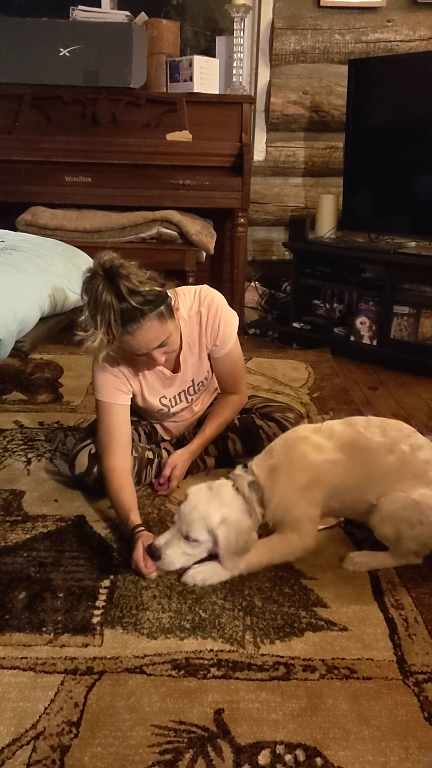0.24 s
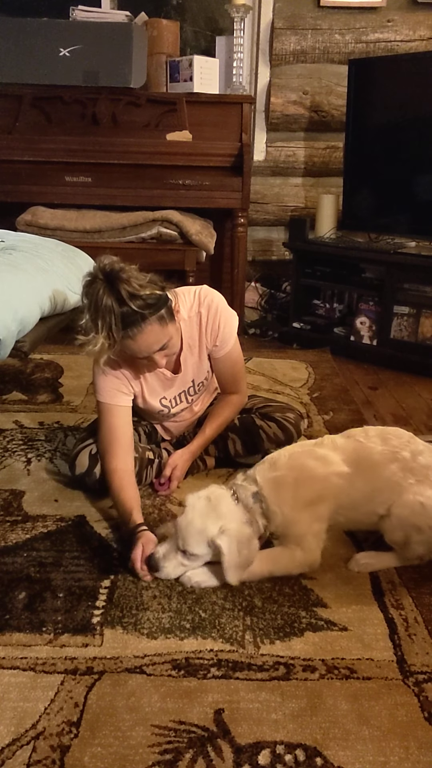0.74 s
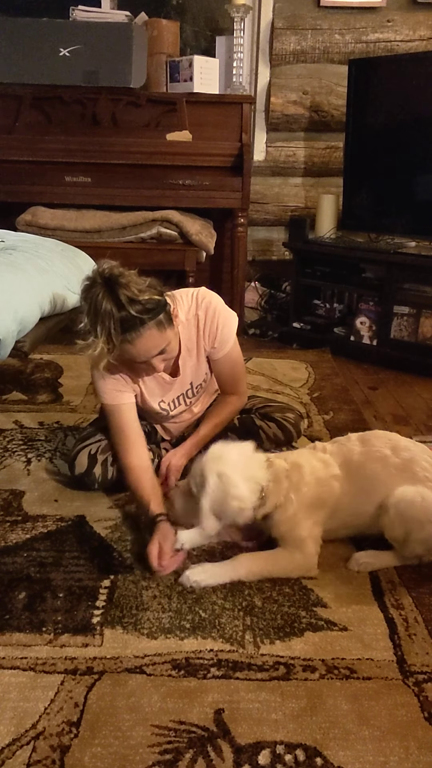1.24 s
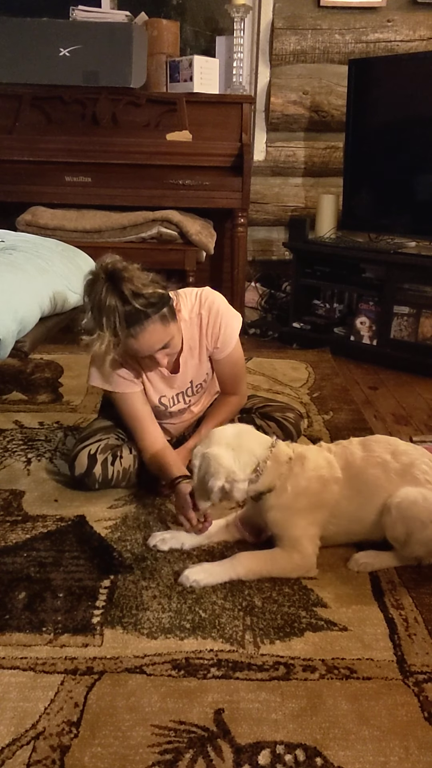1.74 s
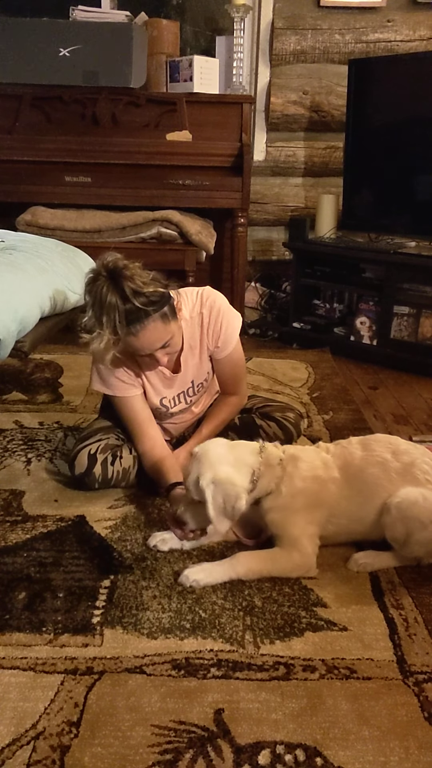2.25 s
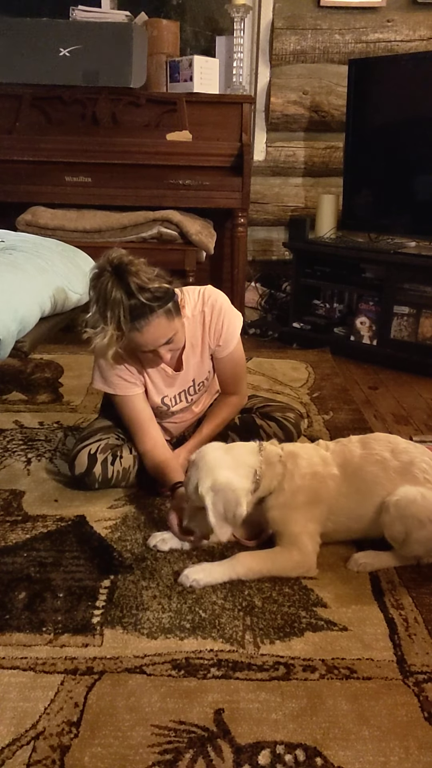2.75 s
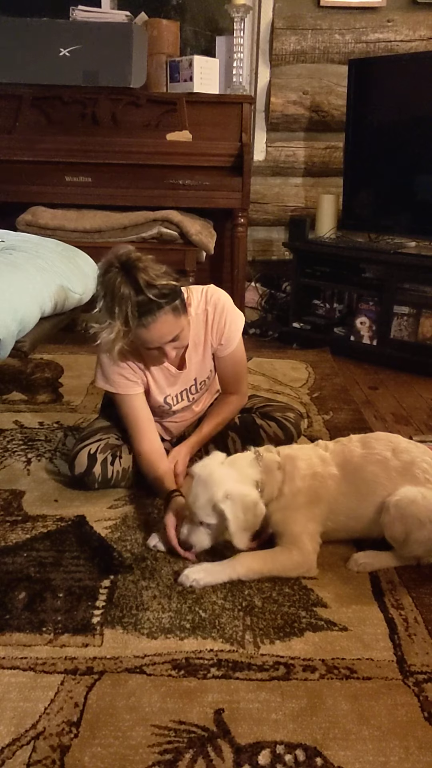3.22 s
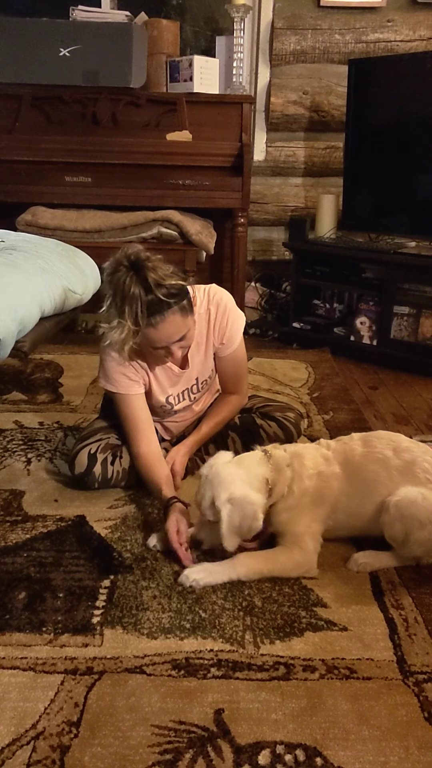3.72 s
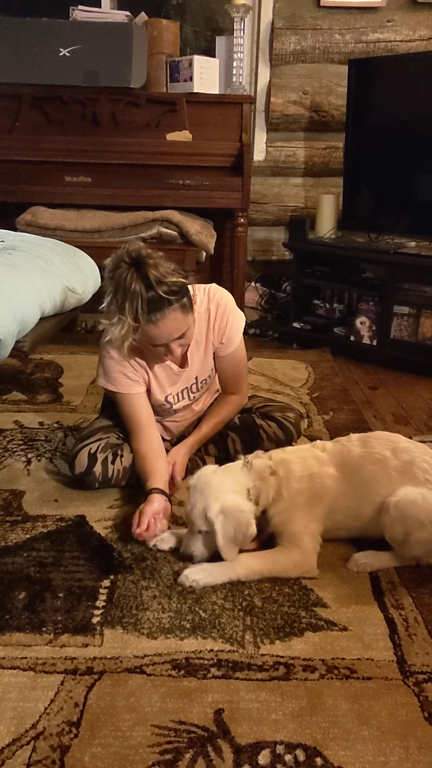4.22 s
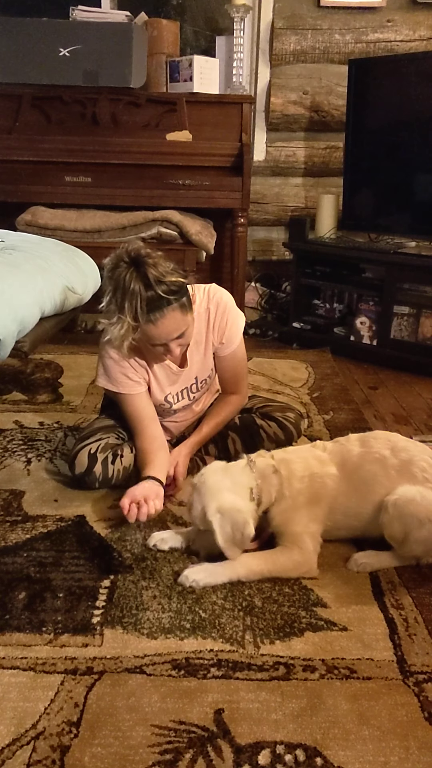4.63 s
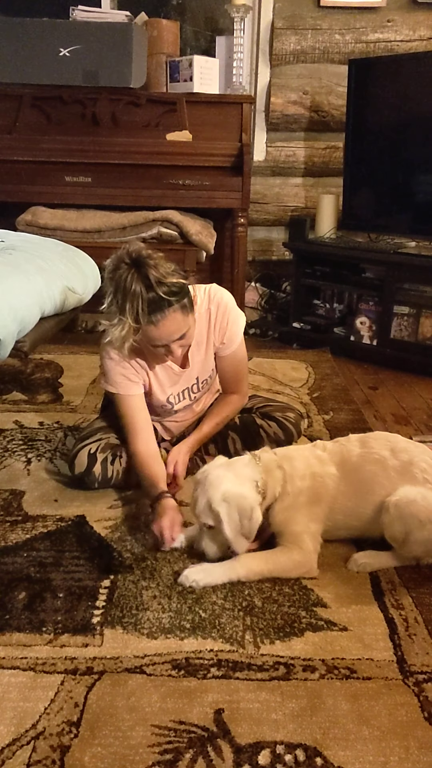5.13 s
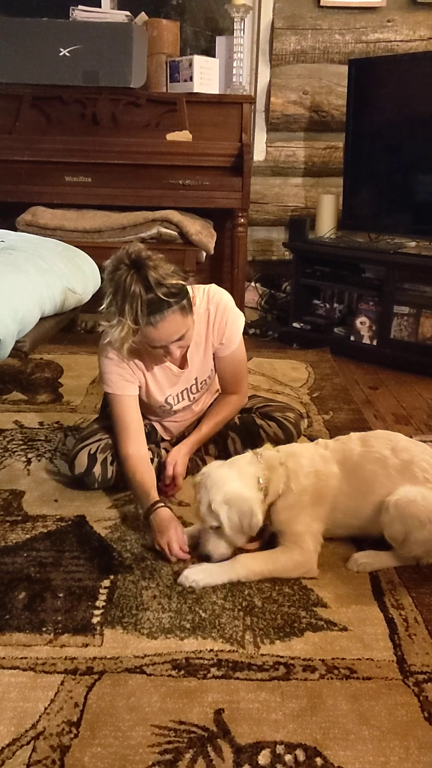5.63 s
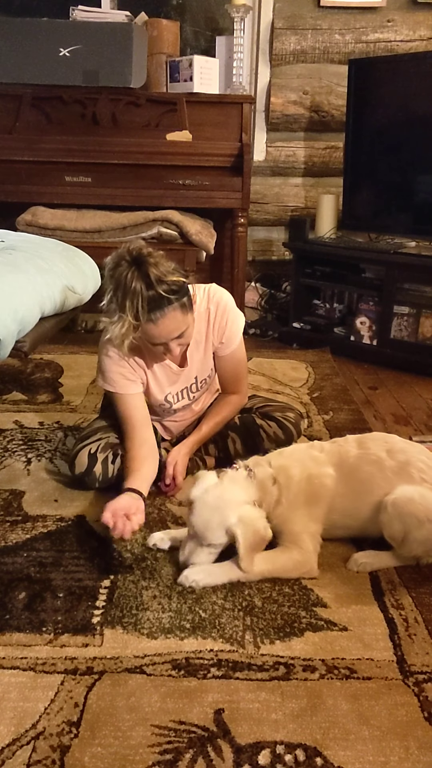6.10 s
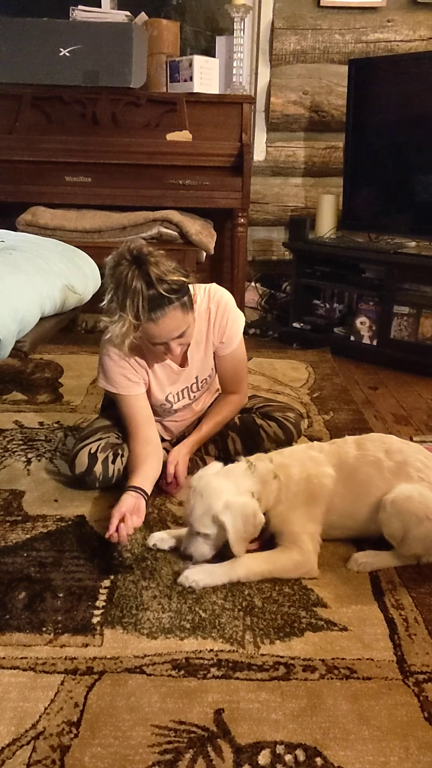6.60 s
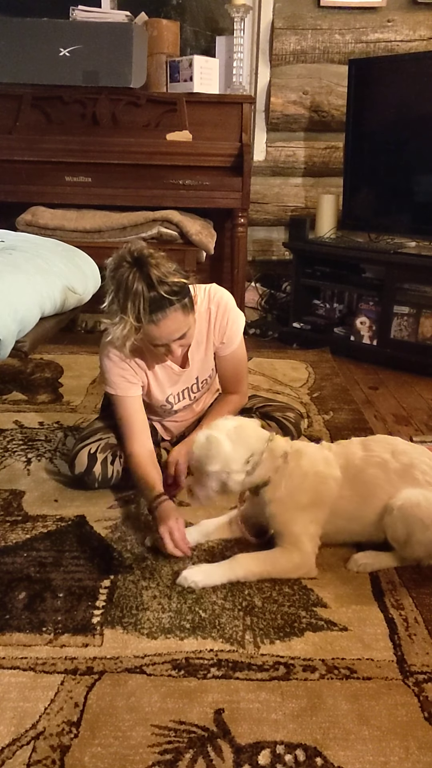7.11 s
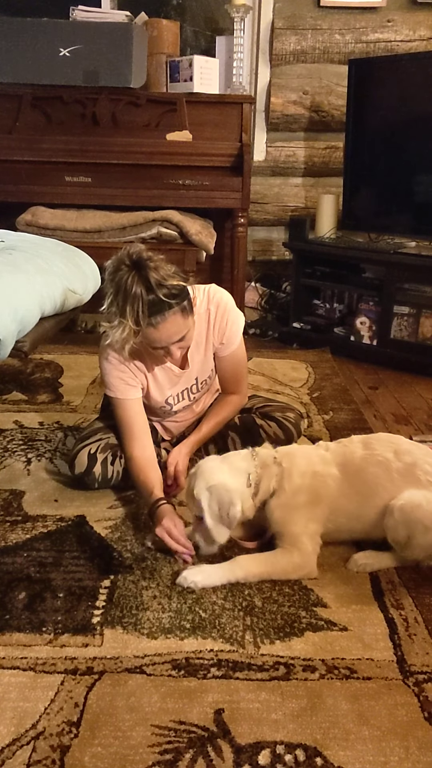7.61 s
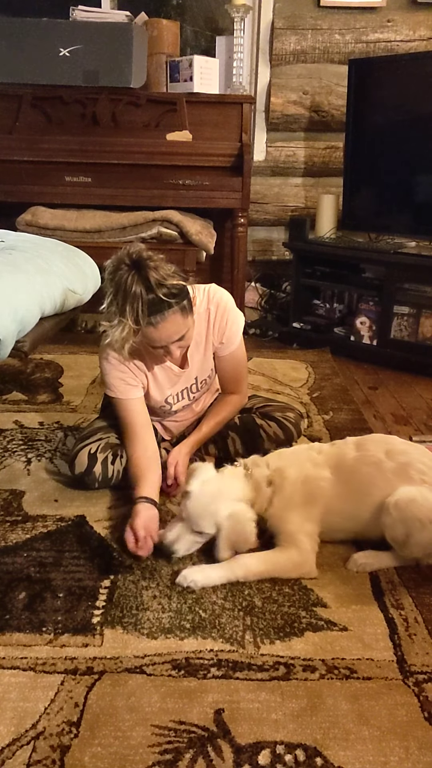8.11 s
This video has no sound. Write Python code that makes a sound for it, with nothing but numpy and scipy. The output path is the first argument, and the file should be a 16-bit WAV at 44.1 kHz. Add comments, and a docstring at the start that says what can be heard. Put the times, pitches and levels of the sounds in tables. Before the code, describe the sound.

A hushed, carpeted living room with low rumble, thin hiss and a barely audible appliance hum that thickens slightly from 3.75 s. Faint brushing of fur and fingers opens it, with a small wet smack at 0.2 s, a very soft bump at 0.25 s and a fuller muffled thud on the floorboards near 0.9 s. A spring-steel clicker then cracks loudly at 1.06 s and snaps back at 1.22 s: dry, bright, metallic, with quick echoes and a short room tail. The pair repeats at 3.08 and 3.25, 4.95 and 5.13, and 6.81 and 6.99 s. Very faint chewing runs from 2.1 to 2.8 s; isolated smacks follow around 3.5 to 4.3 s, then clearer steady chewing, nearly four bites per second, from 4.5 to 5.65 s. A wetter smack lands at 5.75 s, with scattered small ones until 8.1 s.

```python
"""A quiet, carpeted living room: a dog-training clicker is pressed and let go four times.
Its steel tongue buckles with a crack and rings the plastic shell; hard surfaces and the room answer.
A puppy drops onto the rug (low board modes) and mouths its treats (band-passed grainy noise).
Behind: shaped-noise rumble and hiss, an appliance's hum (wavering sines), faint rustling ticks."""
import sys
import numpy as np
from scipy import signal
from scipy.fft import rfft, irfft
from scipy.io import wavfile

SR = 44100
rng = np.random.default_rng(int(sys.argv[2]) if len(sys.argv) > 2 else 0)


def to_wav(s):
    """Save 16-bit WAV."""
    ch = np.atleast_2d(s).T  # columns
    pcm = np.round(np.clip(ch, -1, 1) * 32767)  # PCM
    wavfile.write(sys.argv[1], SR, pcm.astype(np.int16))


N = 368235

# Room air spectrum. Each row: frequency in Hz, relative density in dB.
AIR_SPECTRUM = [(20, -25.5), (45, -15.5), (85, -6.5), (180, -0.5), (260, -8.5), (330, -15), (430, -18.5),
                (700, -22), (1800, -24), (4800, -28), (7500, -34), (10000, -39), (11400, -34),
                (13500, -42.5)]
# Left-right correlation of the air. Each row: frequency in Hz, correlation from -1 to 1.
AIR_CORRELATION = [(60, 0.74), (150, 0.24), (380, 0.95), (950, -0.14), (2380, -0.18), (5980, -0.04),
                   (15000, 0.19)]
AIR_DB = -64
# Hum lines that run throughout. Each row: frequency in Hz, RMS level in dB.
STEADY_HUM = [(91.5, -80), (120, -79.5), (199, -77.5)]
# Hum lines that join in later. Each row: frequency in Hz, RMS level in dB.
LATE_HUM = [(186, -76), (279.9, -76.5), (371.6, -76.5)]
LATE_HUM_START_S = 3.75
# Diffuse room colour. Each row: frequency in Hz, gain in dB.
ROOM_COLOUR = [(200, 4), (600, -2.5), (1100, 2), (2000, 4), (3000, 6), (4200, 0.5), (6300, -3.5),
               (9000, -5), (12000, -2.5), (16000, -3)]
# Diffuse room decay. Each row: frequency in Hz, t60 in seconds.
ROOM_T60 = [(200, .25), (1000, 0.13), (2000, 0.15), (4200, 0.175), (7000, .17), (11000, 0.175),
            (16000, 0.16)]
# Brushes of fingers, fur and collar. Each row: start in seconds, energy in dB before the dry and
# room gains, length in seconds.
BRUSHES = [(0.029, -34.5, .068), (0.368, -37, 0.021), (.948, -39.5, .05), (1.613, -38, .15),
           (2.222, -38.5, .043), (2.427, -39, 0.068), (3.661, -38, 0.021), (4.301, -40.5, .017),
           (5.748, -38, .047), (8.16, -38, .04)]
BRUSH_HZ = 9200
# Puppy's landings. Each row: start in seconds, level of the boards in dB, energy of the knock in dB
# before the dry and room gains.
THUMPS = [(0.254, -15.5, -44), (0.873, -6.5, -26.5)]
# Floorboard modes. Each row: frequency in Hz, energy in dB before the landing's level, t60 in seconds.
BOARD_MODES = [(50.4, -16.5, .45), (66, -19.5, .35), (97, -19.5, .16), (198, -17, .14)]
# Single smacks at the treats. Each row: start in seconds, energy in dB before the dry and room gains,
# pitch in Hz, t60 in seconds.
SMACKS = [(.19, -35, 950, 0.13), (3.463, -31, 990, 0.17), (4.009, -36, 1080, .035),
          (4.291, -33.5, 1120, 0.036), (5.75, -28, 1620, 0.21), (6.109, -33.5, 890, 0.036),
          (6.161, -34.5, 1370, 0.023), (6.377, -32.5, 940, 0.013), (6.771, -34, 846, 0.046),
          (7.37, -36, 1380, 0.049), (8.14, -30, 780, 0.044)]
# Bouts of steady chewing. Each row: start in seconds, end in seconds, mean energy of a bite in dB
# before the dry and room gains.
CHEW_BOUTS = [(2.087, 2.8, -45), (4.53, 5.65, -34.5)]
CHEWS_PER_S, CHEW_CENTRE_HZ, CHEW_T60_S = 3.9, 764, .08
# Tongue buckles. Each row: start in seconds, snap level in dB, pitch factor from the grip,
# crack level in dB, first echo in dB before the side gains, offset of late echoes and room in dB.
PRESSES = [(1.0615, -0.5, 1.054, 2.5, -8.5, 1), (3.0764, 1.5, 1.022, -1.5, -13.5, -1.5),
           (4.9537, -2, .995, 0.5, -17.5, 0), (6.8103, -1.5, 1.015, -0.5, -4.5, 4)]
# Tongue springs back. Each row: start in seconds, snap level in dB, pitch factor from the grip,
# crack level in dB, first echo in dB before the side gains, offset of late echoes and room in dB.
RELEASES = [(1.2173, 1.18, 1.036, -1.5, -12.5, -0.5), (3.2469, 1.57, 1, -3.5, -13.5, -2.5),
            (5.1297, -1.3, 1, 0.5, -2.5, 0.5), (6.9859, -0.25, 1.013, -0.5, -1, 0.5)]
# Modes of bent tongue and shell. Each row: frequency in Hz before the pitch factor,
# energy in dB before the snap level, t60 in seconds.
PRESS_MODES = [(1630, -23, 0.095), (1829, -12, 0.034), (1924, -20, 0.24), (4050, -3.5, 0.0058),
               (4136, 3, 0.012), (4320, 0.5, .005), (5700, -5, 0.0026), (4016, -8.5, 0.16),
               (4370, -12.5, .14), (4540, -15, .09)]
# Modes of tongue at rest and shell. Each row: frequency in Hz before the pitch factor,
# energy in dB before the snap level, t60 in seconds.
RELEASE_MODES = [(1786, -13.5, 0.049), (2425, -16, 0.033), (3060, -13, 0.013), (4030, 0, 0.0049),
                 (4800, -9, 0.018), (5900, -4, 0.019), (6443, 2, 0.006), (9420, -10, 0.0024),
                 (4060, -19.5, .08)]
# Crack of the buckling. Each row: frequency in Hz, relative gain in dB.
PRESS_CRACK = [(100, -21), (350, -18), (600, -10), (900, -19.5), (1200, -16), (1700, -5.5), (2800, -2),
               (4500, -2), (7000, 5.5), (9000, 7.5), (11000, 4), (13000, 0.5), (16000, -8)]
# Crack of the spring-back. Each row: frequency in Hz, relative gain in dB.
RELEASE_CRACK = [(100, -21.5), (400, -20), (650, -18.5), (1050, -15), (1300, -20), (1700, 2), (3000, -3.5),
                 (6700, 5.5), (7550, -1), (9500, 2), (13000, 4), (14200, -1), (16000, -6)]
# Early echoes off the furniture; the level is that of the first, before the row's offset.
ECHO_FIRST_S, ECHO_LAST_S, ECHO_DB, ECHO_FALL_DB_PER_S = .0066, .0172, -15.5, 449.5
BAND_LIMIT_HZ = 15900


def amp(db):
    """Decibels to gain."""
    return 10 ** (np.asarray(db) / 20)


def unit(x):
    """Scales to an energy of one along the last axis."""
    return x / np.sqrt(np.sum(x ** 2, -1, keepdims=True) + 1e-20)


def read(points, hz):
    """Reads a table on a log-frequency axis."""
    table_hz, value = np.transpose(points)
    return np.interp(np.log(hz + 1), np.log(table_hz), value)


def add(mix, start_s, sound):
    """Adds a stereo sound at start_s, cut at the end of the mix."""
    part = mix[:, round(start_s * SR):][:, :sound.shape[-1]]
    part += sound[..., :part.shape[1]]


def causal(gain):
    """Minimum-phase spectrum with this gain over the full circle."""
    return np.exp(np.conj(signal.hilbert(np.log(gain + 1e-9))))


def colour(x, points, size=2048):
    """Minimum-phase filter from a table of Hz and dB."""
    hz = abs(np.fft.fftfreq(size, 1 / SR))
    taps = np.fft.ifft(causal(amp(read(points, hz)))).real
    return signal.fftconvolve(x, taps)[:len(x)]


def band(x, centre_hz, spread):
    """Band-pass from centre_hz / spread to centre_hz * spread."""
    edges_hz = [centre_hz / spread, centre_hz * spread]
    return signal.sosfilt(signal.butter(2, edges_hz, "band", fs=SR, output="sos"), x)


def ring(modes, t, pitch, rise_s):
    """Exponentially dying modes that take a moment to swell."""
    swell = 1 - np.exp(-(t / rise_s) ** 2)
    out = np.zeros(len(t))
    for hz, db, t60_s in modes:
        tone = np.sin(2 * np.pi * hz * pitch * t)
        out += amp(db) * unit(swell * amp(-60 * t / t60_s) * tone)
    return out


def room(x, wet_db, gap_s=.0034, build_s=.004, size=16384):
    """Diffuse tail: dense random reflections, each band dying at its own speed."""
    t = np.arange(size) / SR
    reflections = rng.standard_normal((2, size)) * (rng.random((2, size)) < .25)
    hz, when_s, z = signal.stft(reflections, SR, nperseg=128)
    fall = amp(-60 * when_s / read(ROOM_T60, hz)[:, None])
    tail = signal.istft(z * unit(fall), SR, nperseg=128)[1][:, :size]
    # silent for 1 ms, then faint until the gap ends and the tail builds
    tail = unit(tail * np.clip((t - gap_s) / build_s, .2, 1) * (t > .001))
    tail = np.array([colour(side, ROOM_COLOUR) for side in tail])
    return amp(wet_db) * signal.fftconvolve(x[None], tail, axes=1)[:, :len(x)]


def air():
    """Low rumble and thin hiss: shaped noise, partly alike at the two microphones."""
    hz = np.fft.rfftfreq(N, 1 / SR)
    left, other = rfft(rng.standard_normal((2, N)))
    same = read(AIR_CORRELATION, hz)
    right = same * left + np.sqrt(1 - same ** 2) * other
    pair = np.array([left, right]) * amp(read(AIR_SPECTRUM, hz))
    return amp(AIR_DB) * amp([[-.4], [.4]]) * np.sqrt(N) * unit(irfft(pair, N))


def hum(waver_hz=.5, fade_s=.1):
    """Slightly wavering motor lines; a second set joins in part way."""
    t = np.arange(N) / SR

    def line(hz, db):
        """One line, in its own phase at each microphone."""
        drift = np.interp(t, np.linspace(0, t[-1], 40), rng.standard_normal(40))
        turns = np.cumsum(hz + waver_hz * drift) / SR + rng.normal(0, .035, (2, 1))
        return amp(db) * np.sqrt(2) * np.sin(2 * np.pi * turns)

    joined = np.clip((t - LATE_HUM_START_S) / fade_s, 0, 1)
    return sum(line(*row) for row in STEADY_HUM) + joined * sum(line(*row) for row in LATE_HUM)


def rustle(db, ticks_per_s=70, spread_db=3.5):
    """Coat, sleeves and rug never quite lie still: faint scattered ticks in four bands."""
    out = np.zeros(N)
    for hz in (900, 2200, 5000, 11000):
        struck = rng.random(N) < ticks_per_s / 4 / SR
        ticks = struck * amp(spread_db * np.minimum(rng.exponential(1, N), 3))
        out += unit(band(ticks, hz, 1.4)) * (hz / 900) ** -.3
    return amp(db) * np.sqrt(N) * unit(.5 * out + room(out, 0))


def grains(t):
    """Cubed noise: sparse peaks make it grainy."""
    return rng.standard_normal(len(t)) ** 3


def brush(t, db, length_s):
    """Fingers, fur or collar brushing: grains that swell and fade."""
    arch = np.sin(np.pi * np.minimum(t / length_s, 1))
    return amp(db) * unit(band(grains(t) * arch, BRUSH_HZ, 1.78))


def knock(t, db):
    """Broad, short noise of a landing."""
    return amp(db) * unit(band(grains(t) * amp(-60 * t / .032), 450, 4.2))


def smack(t, db, hz, t60_s):
    """Wet mouth noise: quick-rising, dying grains in a resonance."""
    envelope = amp(-60 * t / t60_s) * (1 - np.exp(-t / .0024))
    return amp(db) * unit(band(grains(t) * envelope, hz, 1.35))


def chewing(jitter_s=.033, spread_db=2.5, spread_octaves=.15, count=8):
    """The jaw works at a loose, steady pace; returns one row per bite, as in SMACKS."""
    bites = []
    for start_s, end_s, db in CHEW_BOUTS:
        for k, (late, size, tone) in enumerate(rng.standard_normal((count, 3))):
            beat_s = start_s + k / CHEWS_PER_S
            if beat_s < end_s:
                hz = CHEW_CENTRE_HZ * 2 ** (spread_octaves * tone)
                bites.append((beat_s + jitter_s * late, db + spread_db * size, hz, CHEW_T60_S))
    return bites


def puppy():
    """Wet smacks in the mouth, grainy brushing, and soft landings on the boards."""
    out, t = np.zeros((2, N)), np.arange(SR // 2) / SR
    small = [(s, brush(t, db, length_s)) for s, db, length_s in BRUSHES]
    for s, db, knock_db in THUMPS:
        add(out, s, amp(db) * ring(BOARD_MODES, t, pitch=1.0, rise_s=.011))
        small.append((s - .006, knock(t, knock_db)))
    small += [(s, smack(t, db, hz, t60_s)) for s, db, hz, t60_s in SMACKS + chewing()]
    for s, sound in small:
        add(out, s, amp(-6.0) * sound + room(sound, wet_db=-8.5))
    return out


def chatter(t, t60_s, tick_db, size=4096):
    """A tick and a brief rattle, smeared in time but even in spectrum."""
    burst = unit(rng.standard_normal(size) * amp(-60 * t[:size] / t60_s))
    burst[0] += amp(tick_db)
    z = np.fft.fft(burst)
    even = np.fft.ifft(z / causal(abs(z))).real
    return np.pad(even, (0, len(t) - size))


def snaps(rows, modes, crack_spectrum, tick_db, chatter_t60_s, rise_s, wet_db, count=7):
    """The tongue flips in an instant, chatters briefly and rings the shell; surfaces answer."""
    out, t = np.zeros((2, N)), np.arange(SR // 2) / SR
    for s, db, pitch, crack_db, echo_db, room_db in rows:
        crack = amp(crack_db) * colour(chatter(t, chatter_t60_s, tick_db), crack_spectrum)
        snap = amp(db) * (crack + ring(modes, t, pitch, rise_s))

        # reaches the right microphone one sample earlier
        direct = np.array([np.r_[0, snap[:-1]], snap])
        add(out, s, direct * amp([[.4], [-.4]]))

        # nearest hard surface: level varies as the hand turns, left first
        echo = np.array([snap, np.r_[np.zeros(4), snap[:-4]]])
        add(out, s + .0049, echo * amp(echo_db) * amp([[-1], [-7]]))

        # furniture scatters later echoes, weaker with delay, different at each microphone
        delays_s = np.linspace(ECHO_FIRST_S, ECHO_LAST_S, count) + rng.uniform(-.00066, .0006, count)
        for delay_s in delays_s:
            scattered = np.array([signal.fftconvolve(snap, chatter(t, .0015, -6.5))[:len(t)]
                                  for side in range(2)])
            late_db = room_db + ECHO_DB - ECHO_FALL_DB_PER_S * (delay_s - ECHO_FIRST_S)
            add(out, s + delay_s, scattered * amp(late_db))

        add(out, s, room(snap, room_db + wet_db))
    return out


def clicker():
    """Press buckles the steel tongue; release lets it spring back."""
    press = snaps(PRESSES, PRESS_MODES, PRESS_CRACK, tick_db=-9.0,
                  chatter_t60_s=.0027, rise_s=.00087, wet_db=-.5)
    release = snaps(RELEASES, RELEASE_MODES, RELEASE_CRACK, tick_db=-6.5,
                    chatter_t60_s=.011, rise_s=.00033, wet_db=1.5)
    return press + release


def scene():
    """Room, puppy and clicker."""
    return air() + hum() + rustle(db=-79.0) + puppy() + clicker()


def record(dry, low_hz=42):
    """The microphone sheds deep bass and rounds off the sharpest peaks; then the band limit."""
    lean = signal.sosfilt(signal.butter(2, low_hz, "high", fs=SR, output="sos"), dry)
    rounded = lean / (1 + (lean / .85) ** 4) ** .25
    low_pass = signal.firwin(511, BAND_LIMIT_HZ, window=("kaiser", 8), fs=SR)
    return signal.oaconvolve(rounded, low_pass[None], "same", axes=1)


dry = scene()
out = record(dry)
to_wav(out)
```